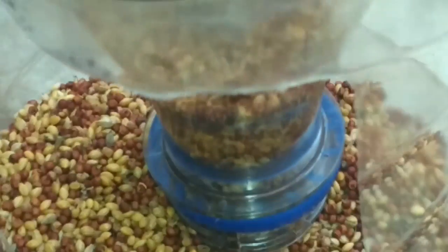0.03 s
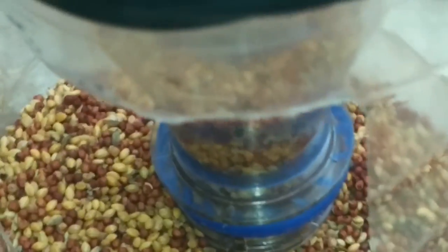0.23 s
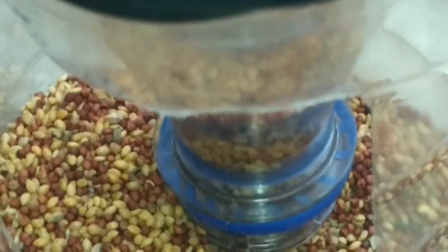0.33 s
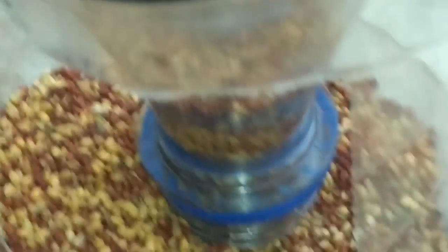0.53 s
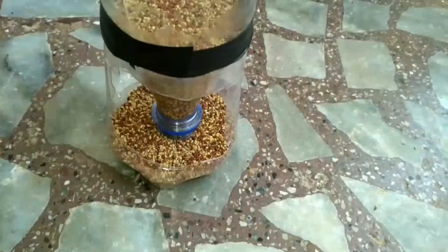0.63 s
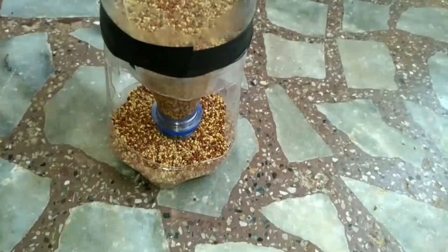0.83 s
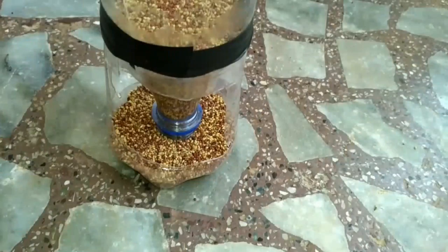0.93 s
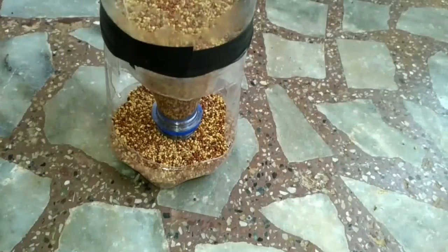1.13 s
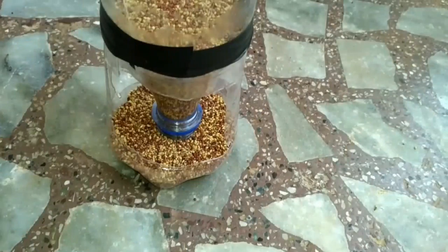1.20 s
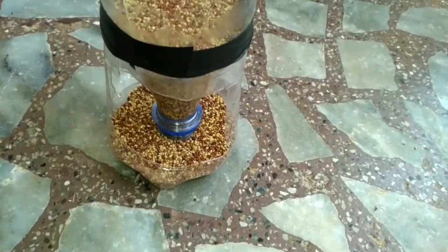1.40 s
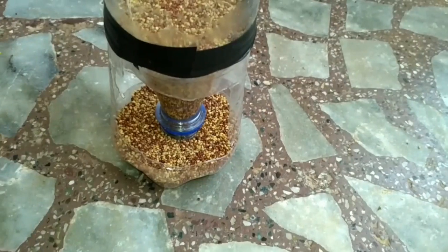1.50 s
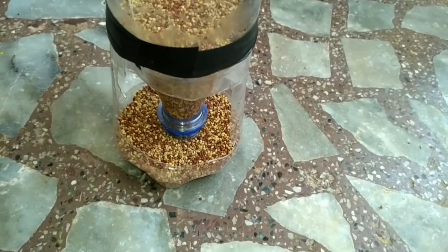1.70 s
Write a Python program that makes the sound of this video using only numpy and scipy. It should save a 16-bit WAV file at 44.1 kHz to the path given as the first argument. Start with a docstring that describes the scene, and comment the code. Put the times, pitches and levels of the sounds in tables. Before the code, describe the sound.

Seed grains shift inside a plastic bottle feeder close to the microphone: a light scrape, a crackle, then two loud rustling rushes. The sound cuts off abruptly, leaving quiet room hiss with faint handling noise.

```python
"""Inside a plastic bottle feeder, close up: seed slides in a light scrape, a crackle and two loud rushes.
Each slide is tiny impacts over rubbing, coloured by wall resonances and short echoes. Seed snaps on
the plastic among brief tones, and a hollow tone glides upward. All cuts off abruptly; after 60 ms
comes quiet room hiss with handling rumble, faint rubs, two small ticks and a tap, then a fade."""
import sys
import numpy as np
from scipy import signal
from scipy.fft import rfft, irfft
from scipy.io import wavfile
from scipy.ndimage import uniform_filter1d, map_coordinates

SR = 44100
rng = np.random.default_rng(int(sys.argv[2]) if len(sys.argv) > 2 else 0)


def wrap_up_sound(samples):
    """Save the sound to the file named by the first command line argument, as 16-bit audio."""
    columns = np.atleast_2d(samples).T
    # keep every value between -1 and 1, then stretch to whole-number steps
    tamed = np.clip(columns, -1, 1)
    steps = np.round(tamed * 32767).astype(np.int16)
    wavfile.write(sys.argv[1], SR, steps)


N = 77175
TIME_S, BIN_HZ = np.arange(N) / SR, np.fft.rfftfreq(N, 1 / SR)
CUT_S, RESUME_S = 0.5525, 0.6138

# Room noise, left to right (frequency [Hz], correlation [ratio])
STEREO_CORRELATION = [(30, 0.96), (250, 0.95), (600, 0.51), (1500, 0.33), (4000, 0.29), (15000, 0.29)]
# Background spectra (frequency [Hz], relative level [dB])
HISS_SPECTRUM = [(88, -26), (150, -2.5), (217, -11), (244, -12.5), (388, -9), (436, -13), (751, -17.5),
                 (877, -16.5), (1150, -18.5), (2180, -20.5), (7000, -24.5), (14100, -21.5), (15500, -35.5)]
NEAR_AIR_SPECTRUM = [(15, -30.5), (25, -3), (152, 4), (349, -2), (895, -4.5), (1710, -29.5), (1950, -12),
                     (2360, -8), (4870, -32.5), (11800, -16.5), (15500, -24)]
RUMBLE_SPECTRUM = [(20, -22.5), (45, -5.5), (70, 2), (112, 2), (140, -16), (172, -4), (230, -21.5),
                   (800, -44.5)]
# Background envelopes (time [s], gain [dB])
HISS_ENVELOPE = [(.61, 0), (.76, 2), (.85, 1.5), (1.25, 1), (1.47, 3), (1.59, -2.5), (1.65, -10),
                 (1.70, -14), (1.75, -18.5)]
RUMBLE_ENVELOPE = [(0, -56), (.23, -51.5), (.3, -63.5), (.61, -54), (.79, -58), (.86, -49.5), (1.25, -47.5),
                   (1.58, -51), (1.66, -73.5), (1.75, -61)]
# Handling swells (start [s], length [s], level [dB])
HAND_BUMPS = [(0.434, 0.06, -41.5), (0.799, 0.049, -44.5), (.95, 0.12, -42), (1.086, 0.12, -44),
              (1.213, 0.05, -40), (1.45, 0.052, -37.5), (1.555, 0.043, -42.5)]
HAND_RUBS = [(1.32, 0.12, -54.5), (1.50, 0.17, -50.5)]
# Sharp contacts (time [s], onset level [dB], decay [s])
ROOM_TICKS = [(.7747, -24.5, 0.00081), (.778, -34, 0.0023)]
DULL_TAPS = [(1.4605, -33.5, 0.0023)]
SEED_SNAPS = [(.106, -37.5, 0.012), (.1955, -23, 0.0037), (.208, -17, 0.0037), (.2305, -20.5, .004),
              (.248, -24, .002), (.287, -19, .003), (.482, -24, .001), (.548, -19.5, .004)]
# Swell and contact spectra (frequency [Hz], relative level [dB])
BUMP_SPECTRUM = [(20, -26), (45, -2), (70, 8.5), (110, -8), (200, -18.5), (500, -41), (2000, -56)]
RUB_SPECTRUM = [(1200, -20), (2200, -7), (2900, 4.5), (3800, -6), (7000, -6.5), (15000, -5)]
TICK_SPECTRUM = [(200, -8), (1500, -15.5), (3000, -21.5), (7000, -9), (11000, -2.5), (15800, -4)]
TAP_SPECTRUM = [(300, -3.5), (800, 0.5), (2000, 6.5), (3500, -9), (7000, -5.5), (12000, 5), (15800, -6)]
SNAP_SPECTRUM = [(500, -41.5), (4000, -26), (6000, -9.5), (9000, -2), (12000, 4.5), (15800, -4)]
# High squeaks, swells of drone overtones, a low thud
# (start [s], length [s], pitch [Hz], glide [share of pitch], level [dB])
BRIEF_TONES = [(.03, 0.051, 1586, 0.019, -42), (0.056, 0.064, 3100, 0.031, -44),
               (.07, 0.071, 464, -0.026, -47.5), (.15, 0.041, 2040, 0.13, -53.5),
               (.212, 0.022, 200, 0, -45), (.368, 0.039, 909.4, -0.03, -47.5),
               (.538, 0.011, 3764, -0.11, -24)]
# Hollow tone (time [s], pitch [Hz], level [dB])
HOLLOW_TRACK = [(0.387, 223.4, -47), (0.414, 216, -41.5), (.425, 235, -31.5), (0.443, 244.4, -43),
                (0.452, 294, -34.5), (.474, 325, -33), (0.492, 322.7, -30.5), (.51, 321, -34),
                (0.53, 334, -43), (.54, 354, -30.5), (0.554, 370, -52.5)]
# Bottle wall resonances (frequency [Hz], width [Hz], relative gain [dB])
WALL_MODES = [(3865, 13, 5.5), (4602, 30, -7.5), (5330, 30, -2.5), (5520, 25, -3.5), (5760, 25, -4),
              (6150, 45, -9), (6630, 30, -16.5), (6792, 25, 0.5), (10610, 35, -1.5), (11657, 35, -1.5)]
# Slides (start [s], rise [s], hold [s], release [dB/s], level [dB], grains [1/s], drift [octave/s])
SEED_SLIDES = [(0.017, 0.025, 0.037, 260.5, -31.5, 4960, 0.028),
               (0.189, .006, .013, 201.5, -22.5, 3200, 0.08), (0.229, 0.051, 0.019, 308, -29, 5700, -0.039),
               (0.304, .033, 0.036, 280.5, -9, 9000, 1.3), (0.422, .021, .026, 238.5, -11, 9500, -1.8),
               (0.528, 0.0131, .009, 404, -21.5, 10000, -0.09)]
# Slide spectra (frequency [Hz], relative level [dB])
SCRAPE_SPECTRUM = [(180, -58.5), (300, -23.5), (372, -17), (461, -16.5), (631, -24), (907, -21),
                   (1240, -16), (1510, -0.5), (2400, -32), (3020, -5.5), (3870, -12.5), (4490, -6),
                   (4960, -19.5), (5480, -5), (8990, -11.5), (10800, -5), (11900, -6), (12700, -28.5),
                   (15500, -38.5)]
CRACKLE_SPECTRUM = [(590, -51.5), (1000, -34.5), (1370, -22.5), (1530, -32.5), (2350, -21), (3910, -37.5),
                    (5340, -21), (6880, -22.5), (12700, -0.5), (15800, -3.5)]
TRICKLE_SPECTRUM = [(290, -68), (500, -24), (1030, -35), (1540, -7.5), (2060, -16.5), (2790, -2),
                    (3270, -14.5), (4300, -9.5), (4830, -19), (5750, 1), (6270, -11.5), (7900, -15),
                    (11800, -4.5), (14700, -9.5), (15800, -14)]
FIRST_RUSH_SPECTRUM = [(680, -68), (1150, -40), (1480, -41), (2120, -24), (2590, -17), (3080, -18),
                       (4010, -8.5), (4840, -11.5), (5640, 1), (6650, -3.5), (7750, -16), (9650, -10.5),
                       (10400, -3), (11600, -10), (13300, -6.5), (15300, -13), (15800, -15.5)]
SECOND_RUSH_SPECTRUM = [(680, -67), (1150, -34), (1450, -30.5), (1550, -33.5), (1860, -23.5), (2120, -15.5),
                        (3260, -13.5), (3970, -4.5), (4840, -5.5), (5580, 1), (6220, -9.5), (7580, -21),
                        (11100, -8), (12800, -12.5), (14600, -9), (15800, -18)]
SETTLE_SPECTRUM = [(470, -24), (800, -13.5), (1820, -47), (2490, -17), (3360, -33), (3620, -10),
                   (3810, -18), (4420, -6), (5540, -5.5), (6760, -14.5), (9470, -30), (10900, -11),
                   (13100, -7), (15800, -3)]
SLIDE_SPECTRA = [SCRAPE_SPECTRUM, CRACKLE_SPECTRUM, TRICKLE_SPECTRUM,
                 FIRST_RUSH_SPECTRUM, SECOND_RUSH_SPECTRUM, SETTLE_SPECTRUM]


def amp(db):
    """Decibels to gain."""
    return 10 ** (np.asarray(db) / 20)


def unit(x):
    """Scale to rms 1."""
    return x / np.sqrt(np.mean(x ** 2) + 1e-20)


def per_bin(points):
    """Curve at each FFT bin, interpolated on log frequency."""
    hz, value = np.transpose(points)
    return np.interp(np.log(BIN_HZ + 1), np.log(hz + 1), value)


def filtered(x, response):
    """Apply one gain per FFT bin."""
    return irfft(rfft(x) * response, N)


def colour(x, spectrum):
    """Shape by a spectrum; 12 dB/octave roll-off below its first point."""
    skirt = np.minimum(BIN_HZ / spectrum[0][0], 1) ** 2
    return filtered(x, amp(per_bin(spectrum)) * skirt)


def envelope(points):
    """Gain over time, linear in dB between points."""
    return amp(np.interp(TIME_S, *np.transpose(points)))


def arch(start_s, length_s):
    """Half-sine swell."""
    return np.sin(np.pi * np.clip((TIME_S - start_s) / length_s, 0, 1))


def wobble(samples):
    """Smoothed random wander, rms 1."""
    return unit(uniform_filter1d(uniform_filter1d(rng.standard_normal(N), samples), samples))


def stereo_noise(spectrum):
    """Coloured noise, centred in the bass, wider in the treble."""
    correlation = per_bin(STEREO_CORRELATION)
    mid = unit(colour(rng.standard_normal(N), spectrum))
    side = unit(colour(rng.standard_normal(N), spectrum))
    mid = filtered(mid, np.sqrt((1 + correlation) / 2))
    side = filtered(side, np.sqrt((1 - correlation) / 2))
    return np.array([mid + side, mid - side])


def room_hiss(hiss_db=-51.5, whine_hz=14000, whine_db=-72):
    """Hiss and a faint whine; start after the gap, fade at the end."""
    whine = amp(whine_db) * unit(np.sin(2 * np.pi * whine_hz * TIME_S))
    hiss = amp(hiss_db) * stereo_noise(HISS_SPECTRUM)
    return (hiss + whine) * envelope(HISS_ENVELOPE) * (TIME_S >= RESUME_S)


def rumble():
    """Low noise of room and hand, muted in the gap."""
    outside_gap = (TIME_S < CUT_S) | (TIME_S >= RESUME_S)
    return stereo_noise(RUMBLE_SPECTRUM) * envelope(RUMBLE_ENVELOPE) * outside_gap


def drone(pitch_hz=230, overtones_db=(-64.5, -65.5, -61.5, -66, -67.5)):
    """Faint, distant tone: wavering overtones, no fundamental."""
    return sum(amp(db) * unit((1 + wobble(1500)) * np.sin(2 * np.pi * harmonic * pitch_hz * TIME_S))
               for harmonic, db in enumerate(overtones_db, 2))


def handling(swells, spectrum):
    """Hand bumps or rubs: soft swells of noise."""
    level = sum(amp(db) * arch(start_s, length_s) for start_s, length_s, db in swells)
    return stereo_noise(spectrum) * level


def clicks(contacts, spectrum):
    """Sharp contacts: noise bursts with exponential decay."""
    level = sum(amp(db) * (TIME_S >= at_s) * np.exp(-np.maximum(TIME_S - at_s, 0) / decay_s)
                for at_s, db, decay_s in contacts)
    white = rng.standard_normal(N)
    return colour(level * white, spectrum) / np.std(colour(white, spectrum))


def brief_tones(roughness=0.5):
    """Short high squeaks, brief swells of the distant drone's overtones, a soft low thud."""
    out = np.zeros(N)
    for start_s, length_s, centre_hz, glide, db in BRIEF_TONES:
        pitch_hz = centre_hz * (1 + glide * np.clip((TIME_S - start_s) / length_s - 0.5, -0.5, 0.5))
        tone = np.sin(2 * np.pi * np.cumsum(pitch_hz) / SR)
        out += amp(db) * arch(start_s, length_s) * unit((1 + roughness * wobble(120)) * tone)
    return out


def hollow_tone(harmonics_db=(0, -16, -34.5), jitter=0.028, roughness=0.31):
    """Rough tone rising through the second rush, perhaps air in the bottle."""
    times_s, track_hz, track_db = np.transpose(HOLLOW_TRACK)
    pitch_hz = np.interp(TIME_S, times_s, track_hz) * (1 + jitter * wobble(120))
    phase = 2 * np.pi * np.cumsum(pitch_hz) / SR
    tone = sum(amp(db) * np.sin(harmonic * phase) * (1 + roughness * wobble(150))
               for harmonic, db in enumerate(harmonics_db, 1))
    sounding = (TIME_S > times_s[0]) & (TIME_S < times_s[-1])
    return unit(tone) * amp(np.interp(TIME_S, times_s, track_db)) * sounding


def bottle_wall(x, ring_db=-0.5):
    """Add the narrow resonances of the plastic wall."""
    ring = sum(amp(db) / (1 + 2j * (BIN_HZ - hz) / width_hz) for hz, width_hz, db in WALL_MODES)
    return filtered(x, 1 + amp(ring_db) * ring)


def bottle_echoes(x, t60_s=0.051, echo_db=-4.5):
    """Add reflections inside the bottle, one per millisecond."""
    delays_ms = np.arange(2, 60) + rng.random(58)
    at = (delays_ms * SR / 1000).astype(int)
    echoes = np.zeros(N)
    echoes[at] = rng.choice([-1, 1], len(at)) * amp(-60 * TIME_S[at] / t60_s)
    return filtered(x, 1 + amp(echo_db) * rfft(echoes) / np.linalg.norm(echoes))


def seed_grains(rate_per_s, spread_db=2.5, rub_gain=0.65):
    """Tiny random impacts over smooth rubbing."""
    sizes = amp(spread_db * np.minimum(rng.exponential(1, N), 4)) * rng.choice([-1, 1], N)
    impacts = unit(sizes * (rng.random(N) < rate_per_s / SR))
    return impacts + rub_gain * rng.standard_normal(N)


def seed_slides(treble_hz=8400, treble_extra_db_per_s=108, max_drift_oct=0.15):
    """Showers of seed swell, hold and die; treble goes first as the seed slows."""
    out = np.zeros(N)
    highpass = 1 - 1 / (1 + (BIN_HZ / treble_hz) ** 10)
    for slide, spectrum in zip(SEED_SLIDES, SLIDE_SPECTRA):
        start_s, rise_s, hold_s, release_db_per_s, db, rate_per_s, drift_oct_per_s = slide
        past_rise_s = TIME_S - start_s - rise_s
        grains = colour(seed_grains(rate_per_s), spectrum)
        # Resampling shifts the spectrum; the wall modes stay put.
        shift_oct = np.clip(drift_oct_per_s * (past_rise_s - hold_s / 2), -max_drift_oct, max_drift_oct)
        drifting = map_coordinates(grains, [np.cumsum(2 ** shift_oct)], order=5, mode="wrap")
        shower = unit(bottle_echoes(bottle_wall(drifting)))
        dying_s = np.maximum(past_rise_s - hold_s, 0)
        shower -= filtered(shower, highpass) * (1 - amp(-treble_extra_db_per_s * dying_s))
        attack = np.clip((TIME_S - start_s) / rise_s, 0, 1)
        out += attack * amp(db - release_db_per_s * dying_s) * shower
    return out


def scene(near_air_db=-58, gap_db=-39.5, right_over_left_db=1.5):
    """Bottle close up, a near-silent gap, then the quiet room."""
    close = seed_slides() + clicks(SEED_SNAPS, SNAP_SPECTRUM) + hollow_tone() + brief_tones()
    close = close + drone() + amp(near_air_db) * stereo_noise(NEAR_AIR_SPECTRUM)
    cutoff = np.where(TIME_S < CUT_S, 1, amp(gap_db)) * (TIME_S < RESUME_S)
    room = room_hiss() + rumble()
    room += handling(HAND_BUMPS, BUMP_SPECTRUM) + handling(HAND_RUBS, RUB_SPECTRUM)
    room += clicks(ROOM_TICKS, TICK_SPECTRUM) + clicks(DULL_TAPS, TAP_SPECTRUM)
    balance = amp(right_over_left_db * np.array([[-0.5], [0.5]]))
    return close * cutoff + room * balance


def record(dry):
    """Clip the loudest peaks, then low-pass."""
    ceiling, edge_hz = 0.92, 15700
    lowpass = signal.firwin(401, edge_hz, window=("kaiser", 8), fs=SR)
    return signal.oaconvolve(np.clip(dry, -ceiling, ceiling), lowpass[None], "same")


dry = scene()
out = record(dry)
wrap_up_sound(out)
```